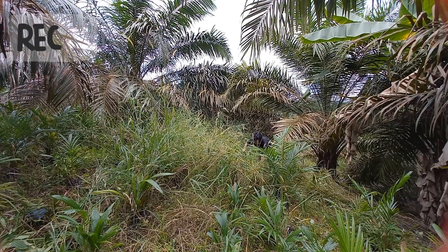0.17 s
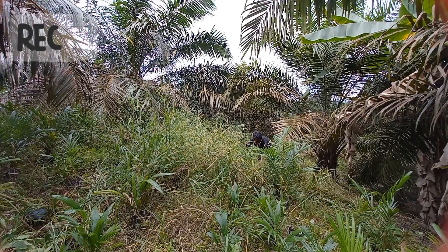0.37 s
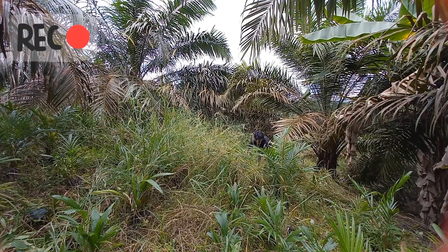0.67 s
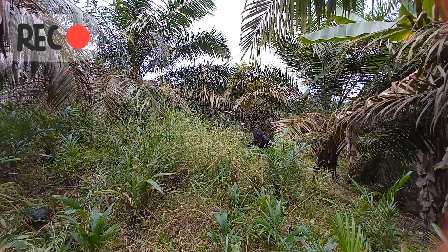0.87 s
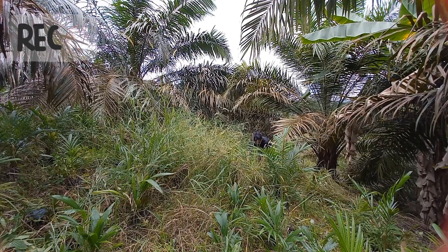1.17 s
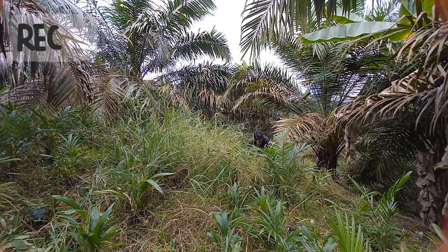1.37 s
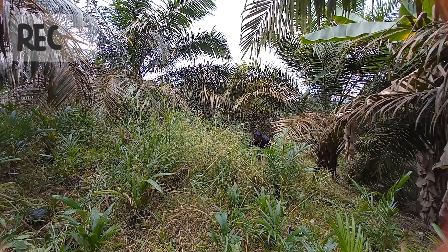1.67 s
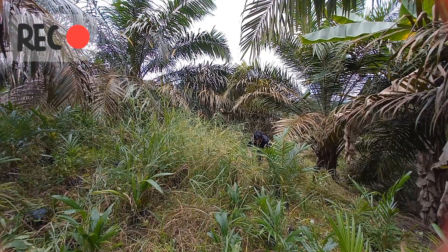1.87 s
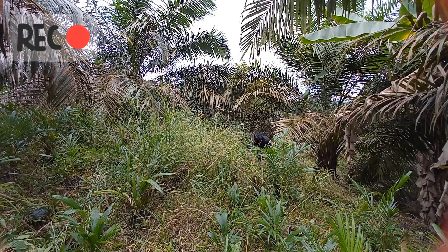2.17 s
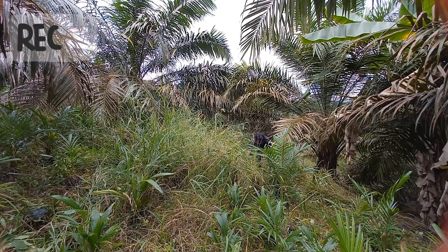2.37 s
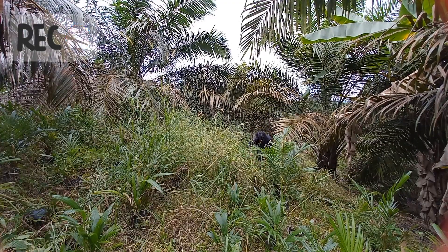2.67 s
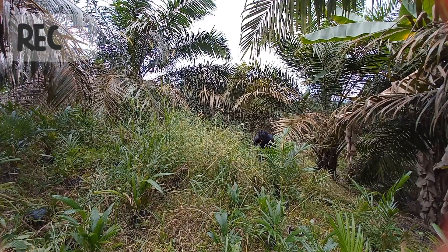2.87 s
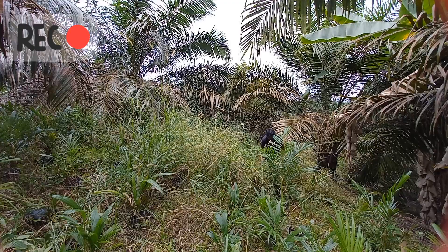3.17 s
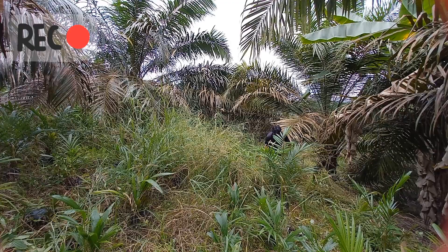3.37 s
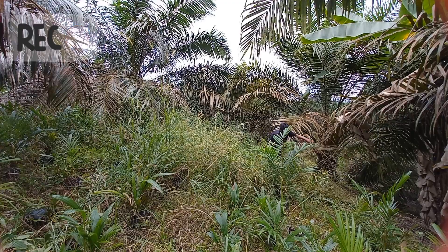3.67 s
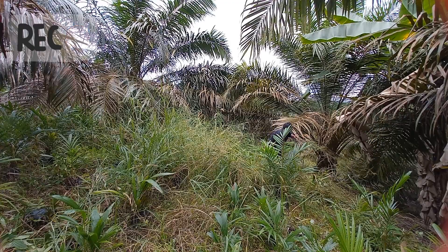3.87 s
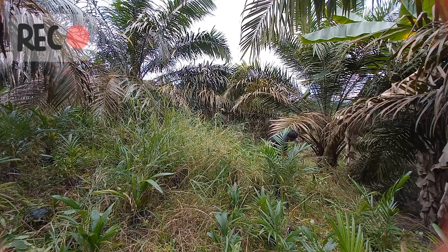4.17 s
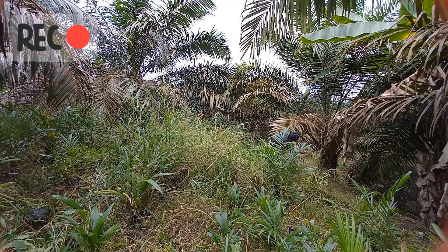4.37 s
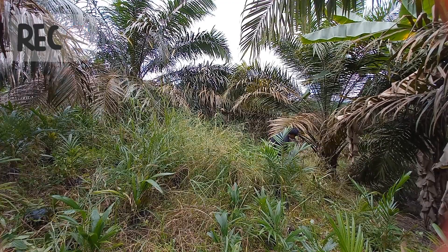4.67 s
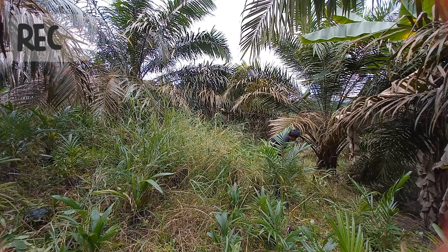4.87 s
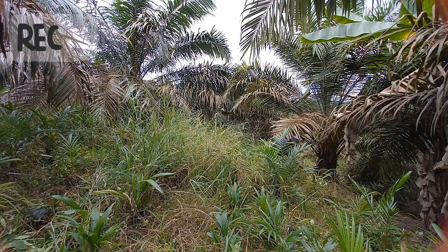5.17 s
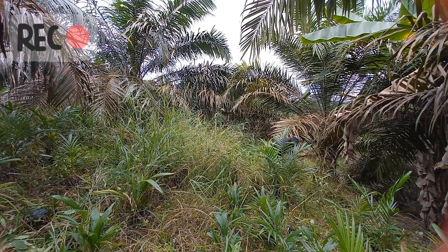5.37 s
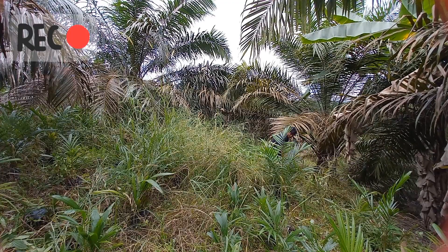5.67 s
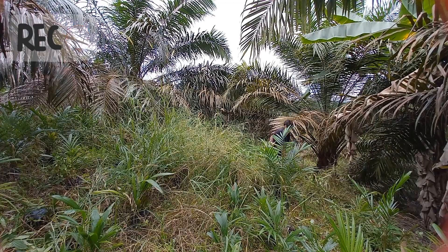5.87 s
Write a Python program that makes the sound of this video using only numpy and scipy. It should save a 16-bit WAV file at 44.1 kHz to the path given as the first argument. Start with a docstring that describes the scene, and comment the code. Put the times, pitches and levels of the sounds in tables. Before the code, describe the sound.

Distant blade chops and snapping stalks, then swishing grass and a rustling dry frond, over steady insects and brief bird chirps.

```python
"""A hard chop through stalks opens the scene: some way off in a palm grove, someone is slashing weeds with
a long blade. Fibres tear, hollow stalks knock, stems snap; then a dry frond is dragged aside and the blade
sweeps twice through soft grass. Insects drone, a small bird chips and a far machine hums. The palms return
a thin echo to the stereo microphone, and near the end one puff of air bumps it."""
import sys
import numpy as np
from scipy import signal
from scipy.fft import rfft, irfft
from scipy.io import wavfile

SR = 44100
rng = np.random.default_rng(int(sys.argv[2]) if len(sys.argv) > 2 else 0)


def wav_record(signal):
    """Record a signal, one row per channel, as 16-bit PCM in the file named by sys.argv[1]."""
    frames = np.transpose(np.atleast_2d(signal))
    bounded = np.clip(frames, -1, 1)
    # unit amplitude maps onto the largest positive 16-bit level
    quanta = np.round(bounded * 32767).astype(np.int16)
    wavfile.write(sys.argv[1], SR, quanta)


N = 265923
TIME, HZ = np.arange(N) / SR, np.fft.rfftfreq(N, 1 / SR)
BAND_LIMIT_HZ = 15900


def amp(db):
    return 10 ** (np.asarray(db) / 20)


def unit_rms(x):
    """Scales a sound so that the mean of its channels has rms 1."""
    return x / np.sqrt(np.mean(np.atleast_2d(x).mean(0) ** 2) + 1e-20)


def curve_at(points, hz):
    freq_hz, value = np.transpose(points)
    return np.interp(np.log(hz + 1), np.log(freq_hz + 1), value)


def add(mix, start_s, sound):
    part = mix[max(round(start_s * SR), 0):][:len(sound)]
    part += sound[:len(part)]


def drift(rate_hz):
    """Random wander of rms 1, changing about rate_hz times a second."""
    return unit_rms(irfft(rfft(rng.standard_normal(N)) * np.exp(-(HZ / rate_hz) ** 2), N))


def hiss():
    return rng.standard_normal((3, N))


def crackle(per_s, spread_db):
    """Three trains of tiny fibre breaks, a few of them large."""
    breaks = hiss() * (rng.random((3, N)) < per_s / SR)
    return breaks * amp(spread_db * np.minimum(rng.exponential(1, (3, N)), 4))


def at_mic(x, lag_ms=0):
    """A sound from the right reaches the microphone's left port later; in the bass both move together."""
    apart = HZ ** 4 / (HZ ** 4 + 560 ** 4)
    left = irfft(rfft(x) * np.exp(-2j * np.pi * HZ * apart * lag_ms / 1000), N)
    return np.array([left, x])


def spread(trains, colour_db, coherence, lag_ms=0):
    """Of three coloured noise trains, one reaches both ports directly; the others scatter to one each."""
    share = np.clip(curve_at(coherence, HZ), 0, 1)
    spectra = rfft(trains) * amp(colour_db)
    direct = at_mic(irfft(spectra[0] * np.sqrt(share), N), lag_ms)
    scattered = irfft(spectra[1:] * np.sqrt(1 - share), N)
    return unit_rms(direct + scattered)


def stroke(start_s, rise_s, hold_s, t60_s):
    """Envelope of one movement: it swells, holds, then dies."""
    swell = np.clip((TIME - start_s) / rise_s, 0, 1)
    return swell * amp(-60 * np.maximum(TIME - start_s - rise_s - hold_s, 0) / t60_s)


# Colour of tearing stalks and of the bunch's thud: freq_hz, relative_db
STALK_SPECTRUM = [(60, -41), (300, -6.5), (800, -11), (2000, -9.5), (3200, -5), (5000, -2.5), (6500, -6.5),
                  (8400, 2), (9500, 0), (13500, 3.5), (15700, 1.5)]
THUD_SPECTRUM = [(25, -27), (55, -9), (100, -1), (220, 3), (550, 1.5), (900, -4), (2000, -0.5), (5000, -13),
                 (16000, -62)]
# How alike the cutting is at the two ports: freq_hz, coherence
CUT_COHERENCE = [(100, 1), (600, 0.82), (1500, 1), (5000, 0.42), (15000, 0.15)]
# Chops through a bunch of stalks, some way off: start_s, tear_db, rise_s, hold_s, t60_s, thud_db
CHOPS = [(0.000, -25.5, 0.0011, 0.0075, 0.22, -30.5), (0.624, -30.5, 0.012, 0.0061, 0.034, -45),
         (0.642, -25, 0.0033, 0.028, 0.16, -36.5), (1.271, -30, 0.01, 0.01, 0.36, -37.5),
         (1.772, -42, .002, 0.0099, 0.44, -59), (2.418, -42, 0.006, 0.005, 0.22, -46.5)]


def chops():
    """Fibres tear in a dense burst; the dull thud of the bunch builds a little later."""
    tear = thud = 0
    for start_s, tear_db, rise_s, hold_s, t60_s, thud_db in CHOPS:
        tear += amp(tear_db) * stroke(start_s, rise_s, hold_s, t60_s)
        thud += amp(thud_db) * stroke(start_s, rise_s + 0.47 * hold_s, 0.4 * hold_s, t60_s=0.15)
    breaks = crackle(per_s=14000, spread_db=2.0)
    fibres = spread(breaks, curve_at(STALK_SPECTRUM, HZ), CUT_COHERENCE, lag_ms=0.053)
    flicker = amp(1.15 * drift(290))
    bunch = spread(hiss(), curve_at(THUD_SPECTRUM, HZ), CUT_COHERENCE, lag_ms=0.049)
    return tear * fibres * flicker + thud * bunch


# The blade meets thick hollow stalks: start_s, level_db, resonance_hz, t60_s
KNOCKS = [(0.004, -19, 148, 0.028), (0.651, -37.5, 2100, 0.11), (1.283, -45, 2670, 0.068),
          (1.772, -42, 840, 0.033), (2.421, -47, 2350, 0.15), (2.428, -46, 680, 0.073),
          (3.480, -49, 600, 0.19), (3.585, -46, 630, 0.15), (3.584, -34, 1790, 0.051),
          (3.585, -30.5, 2970, 0.039), (4.288, -45.5, 1110, 0.25), (4.397, -40, 380, 0.029),
          (4.499, -37.5, 4300, 0.046), (5.262, -42.5, 4570, 0.39), (5.268, -44.5, 434, 0.14)]


def knocks(sharpness=2.13, step_right_s=3.0):
    """Wet stalks are heavily damped: a broad, brief resonance. The later ones come from further right."""
    out, t, hz = np.zeros(N), np.arange(8192) / SR, np.fft.rfftfreq(8192, 1 / SR)[1:]
    for start_s, level_db, resonance_hz, t60_s in KNOCKS:
        detuning = sharpness * (hz / resonance_hz - resonance_hz / hz)
        colour = np.append(0, 1 / (1 + detuning ** 2 / 2))
        ring = unit_rms(irfft(colour * np.exp(2j * np.pi * rng.random(len(colour)))))
        envelope = amp(level_db - 60 * t / t60_s) * np.minimum(t * resonance_hz, 1)
        add(out, start_s, envelope * ring)
    moved = TIME > step_right_s
    return (at_mic(out * ~moved, lag_ms=0.1) + at_mic(out * moved, lag_ms=0.26)) * amp([[0.8], [-0.8]])


# Single stems snapping where the worker cuts: start_s, level_db, t60_s, treble_tilt_db_per_octave
SNAPS = [(0.0045, -18.5, 0.012, -7), (0.6185, -35, 0.025, 0.5), (0.633, -30, .010, 8),
         (0.6446, -17.5, .032, 5), (0.652, -14.5, 0.011, -4.5), (1.271, -21, 0.026, -0.5),
         (1.2848, -21, 0.013, -3.5), (1.7723, -28, 0.018, 2), (2.702, -38, 0.013, -6),
         (3.586, -32.5, 0.012, -7), (4.499, -32, 0.011, -2), (5.222, -36, .008, -1), (5.792, -31, .022, 44)]


def snaps(rise_s=0.00093):
    """Each stem parts with a crack of a few milliseconds; thick dry ones sound lower."""
    out, t, hz = np.zeros(N), np.arange(2048) / SR, np.fft.rfftfreq(2048, 1 / SR)
    treble_octaves = np.log2(np.maximum(hz, 2500) / 2500)
    passband = (hz < BAND_LIMIT_HZ) * hz / (hz + 500)
    for start_s, level_db, t60_s, tilt in SNAPS:
        colour = amp(curve_at(STALK_SPECTRUM, hz) + tilt * treble_octaves) * passband
        crack = unit_rms(irfft(rfft(rng.choice([-1, 1], len(t))) * colour))
        envelope = np.minimum(t / rise_s, 1) * amp(level_db - 60 * np.maximum(t - rise_s, 0) / t60_s)
        add(out, start_s, envelope * crack)
    return at_mic(out, lag_ms=0.077)


# Narrow bands of hiss in the background: pitch_hz, width_hz, level_db, throbs_per_s, throb_depth
HISS_BANDS = [(2012, 85, -67, 17, 0.33), (3017, 67, -73.5, 35, 0.25), (4663, 200, -66, 40, 0.63),
              (6195, 90, -70.5, 21, 1), (7253, 790, -54.5, 36, 0.19), (7630, 440, -53.5, 27, 0.2)]


def throbbing_hiss():
    """Faint narrow bands of hiss that throb unevenly, with insects rasping in the higher ones."""
    out = np.zeros((2, N))
    coherence = [(2000, 1.0), (3100, 1.0), (4800, 0.75), (6300, 0.8), (7500, 0.077)]
    for pitch_hz, width_hz, level_db, throbs_per_s, depth in HISS_BANDS:
        band_db = -40 * np.log10(1 + (2 * (HZ - pitch_hz) / width_hz) ** 2 / 2)
        throb_hz = throbs_per_s * (1 + 0.299 * drift(16))
        throb = 1 + depth * np.sin(2 * np.pi * np.cumsum(throb_hz) / SR)
        out += amp(level_db + 1.1 * drift(5.5)) * throb * spread(hiss(), band_db, coherence)
    return out


# One thin insect whine, centred between the ports: time_s, pitch_hz, level_db
WHINE = [(0, 6120, -77), (2.2, 6170, -67), (2.85, 6230, -62), (3.0, 6330, -64), (4.0, 6300, -59),
         (4.5, 6220, -62), (4.801, 6030, -77), (6.03, 6330, -67)]


def insect_whine(waver_hz=60):
    """A nearly pure, slightly unsteady note that sharpens for a while."""
    time_s, pitch_hz, level_db = np.transpose(WHINE)
    hz = np.interp(TIME, time_s, pitch_hz) + waver_hz * drift(92.3)
    gain = amp(np.interp(TIME, time_s, level_db) + 1.4 * drift(25))
    return at_mic(np.sqrt(2) * gain * np.sin(2 * np.pi * np.cumsum(hz) / SR))


# A machine far off, a little louder on the left: pitch_hz, level_db
MACHINE_TONES = [(410, -58), (569, -72.5), (775, -85.5), (888, -80), (980, -84.5), (1115, -82.5),
                 (1905, -69.5)]


def machine_hum():
    """Tones of a far machine, wavering on their way through the air."""
    tones = np.zeros(N)
    for pitch_hz, level_db in MACHINE_TONES:
        gain = amp(level_db + 0.34 * drift(2.6))
        tones += gain * np.sin(2 * np.pi * np.cumsum(pitch_hz + drift(6.9)) / SR)
    return np.sqrt(2) * tones * amp([[0.6], [-0.6]])


# Colour of the distant murmur and of far insects: freq_hz, relative_db
MURMUR_SPECTRUM = [(25, -32), (45, -50), (75, -7.5), (135, -0.5), (180, -11.5), (290, 4), (400, 3.5),
                   (530, -4), (720, -12), (1550, -18), (1880, -6.5), (2250, -10.5), (4000, -12.5),
                   (16000, -15)]
FIZZ_SPECTRUM = [(1500, -45), (2500, -13), (3150, -5.5), (3500, -10.5), (5100, 1), (6500, -6), (8300, -1.5),
                 (9600, -9), (13000, 0), (15500, 3)]
# How alike the open air is at the two ports: freq_hz, coherence
AIR_COHERENCE = [(60, 0.7), (300, 0.95), (700, 0.74), (1400, 1), (3100, 0.94), (7000, 0.98), (15000, 0.03)]


def distance():
    """The low murmur of the distance and the fizz of far insects, both nearly steady."""
    murmur = amp(-57.5 + 0.5 * drift(7.6)) * spread(hiss(), curve_at(MURMUR_SPECTRUM, HZ), AIR_COHERENCE)
    fizz = amp(-50 + 0.31 * drift(6.6)) * spread(hiss(), curve_at(FIZZ_SPECTRUM, HZ), AIR_COHERENCE)
    return murmur * amp([[0.9], [-0.9]]) + fizz


# Colour of soft grass: freq_hz, relative_db
GRASS_SPECTRUM = [(60, -14), (300, -10.5), (1200, -10.5), (2500, -5.5), (4500, -4.5), (6200, -5), (8400, 2),
                  (9700, -1), (13000, 3.5), (15700, -1)]
# How alike the grass is at the two ports: freq_hz, coherence
GRASS_COHERENCE = [(100, 0.73), (1000, 0.82), (2400, 0.64), (5000, 0.15), (8000, 0.085), (15000, 0.1)]
# Blade or body pushes through grass, right of the microphone: start_s, level_db, rise_s, hold_s, t60_s
SWISHES = [(0.355, -51.5, 0.0097, 0.0059, .12), (0.41, -66, 0.013, 0.017, 0.13),
           (0.93, -50.5, 0.045, 0.011, .15), (1.01, -48, 0.045, 0.037, .35),
           (1.246, -44.5, 0.0044, 0.013, 0.11), (1.65, -50, 0.027, 0.037, 0.28),
           (2.035, -53.5, 0.027, 0.12, 1.2), (2.24, -43.5, .16, .04, .3), (2.489, -46, 0.21, .03, .35),
           (2.89, -45.5, .3, 0.035, 0.94), (3.24, -44.5, 0.096, 0.022, 0.54), (3.43, -45.5, 0.04, 0.3, 1.4),
           (3.955, -39.5, .005, 0.013, 0.48), (4.09, -48.5, 0.065, 0.076, 0.71),
           (4.275, -35, 0.026, .015, .4), (4.34, -36.5, .04, 0.021, 0.7), (4.91, -47.5, 0.028, 0.0064, .15),
           (5.224, -32.5, 0.041, 0.016, 0.42), (5.32, -40, .05, 0.067, 0.27),
           (5.46, -57, 0.009, 0.0074, .1)]


def grass(settle_db=-14, settle_t60_s=2.4):
    """Soft leaves give a bright swish, then go on rustling as they spring back."""
    breaks = crackle(per_s=24000, spread_db=3.0)
    leaves = spread(breaks, curve_at(GRASS_SPECTRUM, HZ), GRASS_COHERENCE, lag_ms=0.19)
    power = np.zeros(N)
    for start_s, level_db, rise_s, hold_s, t60_s in SWISHES:
        push = stroke(start_s, rise_s, hold_s, t60_s)
        settle = amp(settle_db) * stroke(start_s, rise_s, hold_s, settle_t60_s)
        power += (amp(level_db) * np.maximum(push, settle)) ** 2
    return np.sqrt(power) * leaves * amp(1.3 * drift(62)) * amp([[-0.7], [0.7]])


# A small bird in the grove, centred between the ports: start_s, level_db
CHIPS = [(1.406, -43), (1.442, -41.5), (1.560, -42.5), (1.598, -40.5), (1.634, -40), (1.785, -44.5),
         (1.824, -40), (1.858, -41)]


def bird(top_hz=5080, end_hz=4700, length_s=0.0134):
    """Each chip is a short falling whistle, thrown back by the palms."""
    out, t = np.zeros(N), np.arange(0, length_s, 1 / SR)
    envelope = np.sin(np.pi * (t / length_s) ** 1.6)
    for start_s, level_db in CHIPS:
        hz = np.linspace(top_hz, end_hz, len(t)) * (1 + 0.0048 * rng.standard_normal())
        chip = amp(level_db) * envelope * np.sin(2 * np.pi * np.cumsum(hz) / SR)
        add(out, start_s, chip)
        add(out, start_s + 0.012, amp(-4.5) * chip)
    return at_mic(out)


# Colour of a dry palm frond: freq_hz, relative_db
FROND_SPECTRUM = [(100, -44.5), (400, -18), (1100, -6), (1450, -4), (1720, -3), (2100, -1), (3300, -6.5),
                  (5500, -11), (9000, -10), (16000, -39)]
# Tugs that drag it aside, right of the microphone: start_s, level_db, rise_s, hold_s
TUGS = [(2.97, -56.5, 0.24, .03), (3.28, -56.5, .08, 0.044), (3.43, -44, 0.05, 0.013),
        (3.53, -45.5, .015, 0.013), (3.612, -49, 0.0095, 0.09), (3.775, -49, 0.025, 0.021),
        (3.882, -48, 0.012, 0.017), (3.985, -49, 0.013, 0.017)]


def dry_frond(t60_s=0.5):
    """The frond gives a hollow, coarse rustle at each tug, then comes to rest."""
    coherence = [(200, 0.54), (1800, 0.82), (6000, 0.51)]
    breaks = crackle(per_s=2400, spread_db=2.5)
    rustle = spread(breaks, curve_at(FROND_SPECTRUM, HZ), coherence, lag_ms=0.29)
    power = sum((amp(level_db) * stroke(start_s, rise_s, hold_s, t60_s)) ** 2
                for start_s, level_db, rise_s, hold_s in TUGS)
    return np.sqrt(power) * rustle * amp(0.71 * drift(60))


# Colour of air striking the microphone: freq_hz, relative_db
PUFF_SPECTRUM = [(20, -25), (55, 2.5), (85, 6.5), (125, -3), (220, -17), (600, -68)]
# Low rumble of moving air: time_s, level_db
RUMBLE = [(0, -91), (2.8, -74), (3.2, -68.5), (4.2, -68), (6.03, -64.5)]


def moving_air(rumble_pitch_ratio=1.38):
    """A faint rumble creeps in, and one deeper puff bumps the microphone."""
    time_s, level_db = np.transpose(RUMBLE)
    swell = amp(np.interp(TIME, time_s, level_db, left=-200, right=-200))
    rumble = swell * spread(hiss(), curve_at(PUFF_SPECTRUM, HZ / rumble_pitch_ratio), AIR_COHERENCE)
    bump = amp(-49) * stroke(start_s=5.38, rise_s=0.011, hold_s=0.088, t60_s=0.13)
    puff = bump * spread(hiss(), curve_at(PUFF_SPECTRUM, HZ), CUT_COHERENCE)
    return (rumble + puff) * amp([[0.9], [-0.9]])


# Decay of the echo among the palms: freq_hz, t60_s
GROVE_DECAY = [(100, 0.31), (1000, 0.54), (4000, 0.44), (15000, 0.34)]


def grove_echo(x, build_s=0.031):
    """Trunks and fronds scatter a thin tail with little bass, each band dying at its own speed."""
    reflections = rng.standard_normal((2, SR)) * (rng.random((2, SR)) < 0.15)
    hz, t, bands = signal.stft(reflections, SR, nperseg=256)
    envelope = amp(-60 * t / curve_at(GROVE_DECAY, hz)[:, None]) * np.minimum(t / build_s, 1)
    bass_cut = (hz / (hz + 400))[:, None]
    tail = signal.istft(bands * envelope * bass_cut, SR, nperseg=256)[1]
    return signal.fftconvolve(x, tail / np.linalg.norm(tail[0]), axes=1)[:, :N]


def mic_colour(x, port_hz=1800, port_db=3):
    """The ports ring a little; the left one hears more lows and mids, the right one more high treble."""
    ring_db = port_db / (1 + ((HZ - port_hz) / 250) ** 2)
    lean_db = curve_at([(100, 0.5), (700, 3.5), (1500, 0.5), (4500, 2.0), (8000, 0.2), (15000, -2.5)], HZ)
    return irfft(rfft(x) * amp([ring_db + lean_db / 2, ring_db - lean_db / 2]), N)


def scene():
    """The worker and the bird, with their echo, over a steady background."""
    cuts = chops() + snaps() + knocks()
    leaves = grass() + dry_frond()
    chips = bird()
    echo = grove_echo(amp(-13) * cuts + amp(-11) * leaves + amp(-12) * chips)
    ambience = throbbing_hiss() + insect_whine() + machine_hum() + distance() + moving_air()
    return mic_colour(cuts + leaves) + chips + echo + ambience


def record(dry):
    """The recorder's bass cut and band limit."""
    thin = signal.sosfilt(signal.butter(3, 45, "high", fs=SR, output="sos"), dry)
    lowpass = signal.firwin(401, BAND_LIMIT_HZ, window=("kaiser", 7), fs=SR)
    return signal.oaconvolve(thin, lowpass[None], "same")


dry = scene()
out = record(dry)
wav_record(out)
```